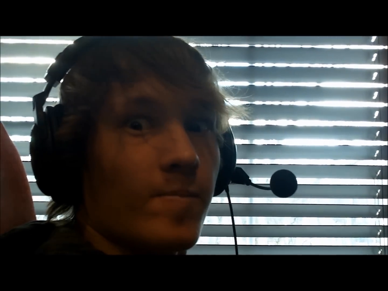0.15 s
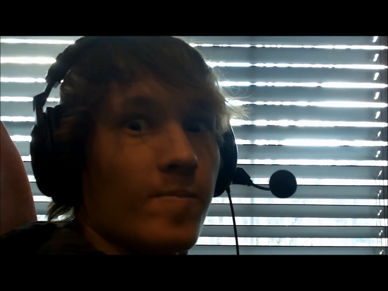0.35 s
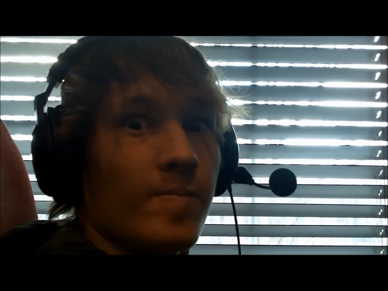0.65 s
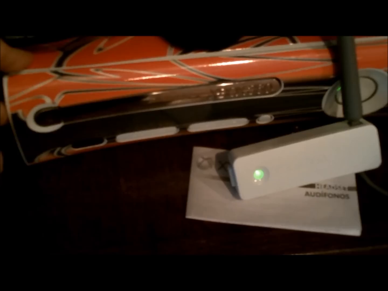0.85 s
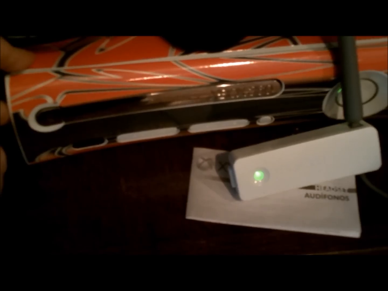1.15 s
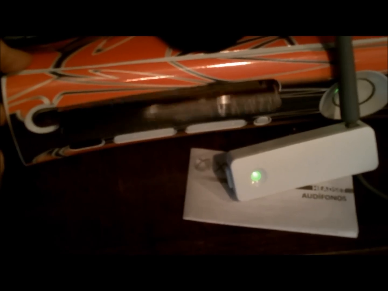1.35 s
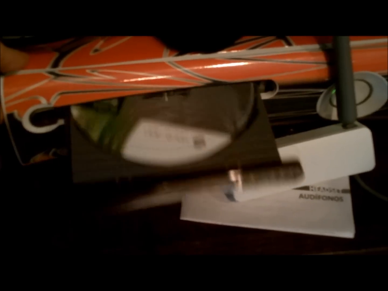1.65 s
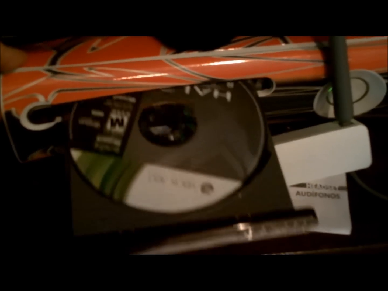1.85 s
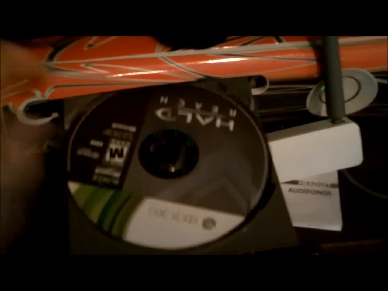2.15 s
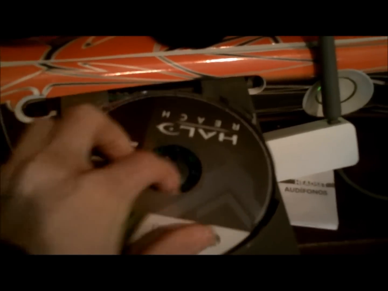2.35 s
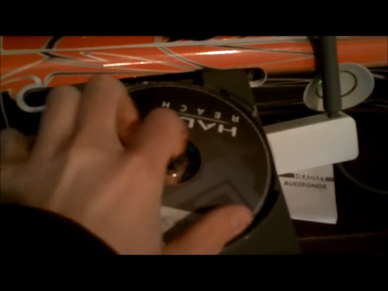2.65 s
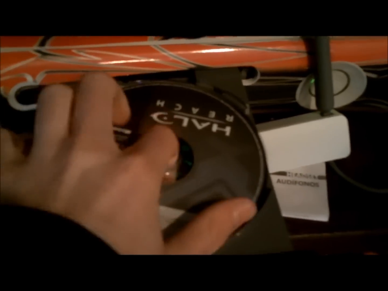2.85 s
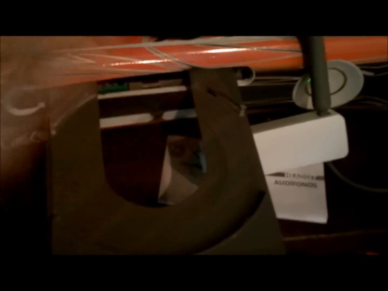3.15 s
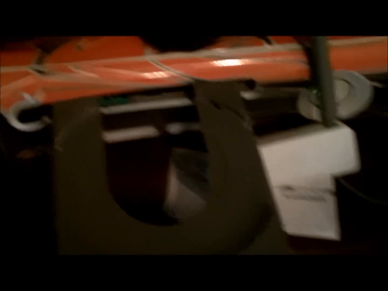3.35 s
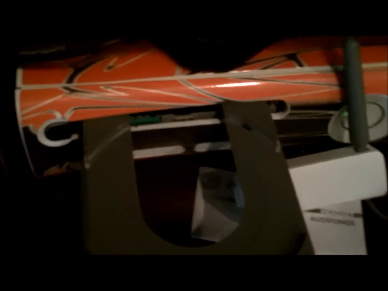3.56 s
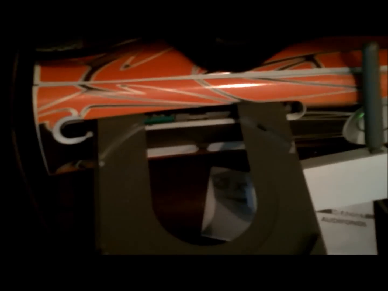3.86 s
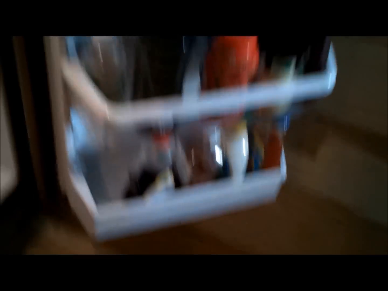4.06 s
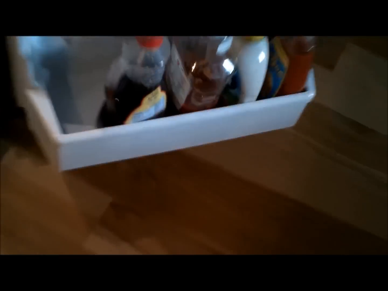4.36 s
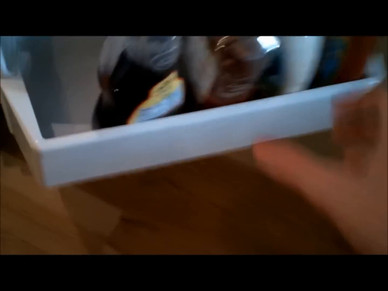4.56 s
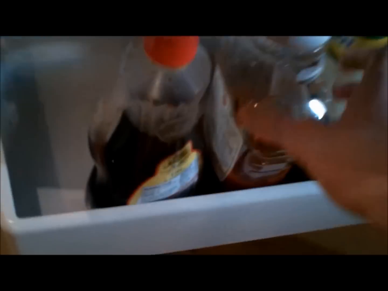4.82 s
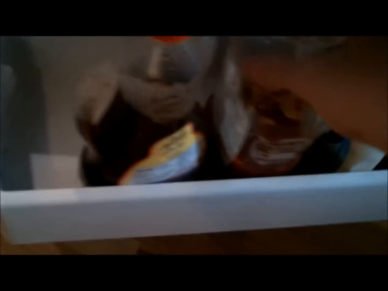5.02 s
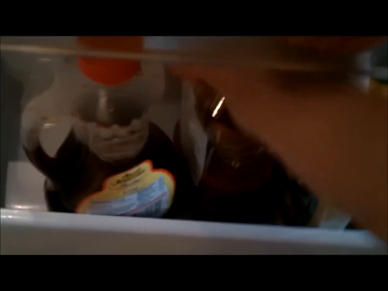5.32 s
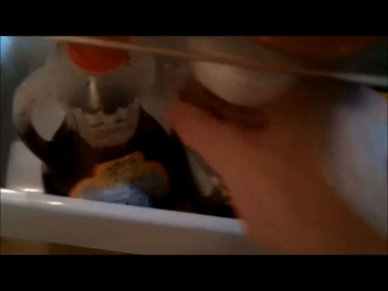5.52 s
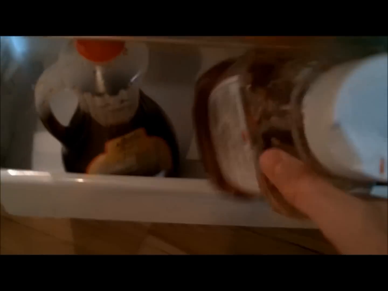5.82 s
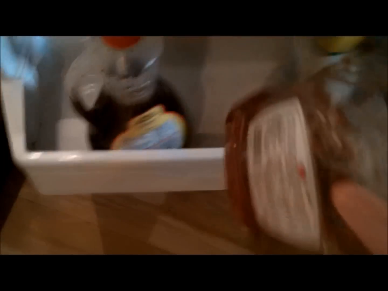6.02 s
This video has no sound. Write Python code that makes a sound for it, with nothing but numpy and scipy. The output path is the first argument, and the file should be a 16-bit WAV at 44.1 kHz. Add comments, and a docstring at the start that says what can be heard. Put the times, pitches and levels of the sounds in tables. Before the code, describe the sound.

Quiet room with a faint chair creak, then a humming console's plastic disc tray clatters out, then sleeves rustle and a fridge-shelf bottle knocks loudly.

```python
"""Three places in turn, each with its own noise-band air and wavering hum. First a quiet room: cloth rubs (clicks
through damped modes) and a chair joint creaks (slip-rate harmonics). From 0.946 s a console hums and whines; its
plastic disc tray slides out in knocks, pings and rubbing, then fingers lift the disc. From 4.075 s a kitchen:
sleeves rustle and a hand pulls a plastic bottle from a fridge door shelf, knocking rail and neighbours (modal
blows, hollow notes, snaps). A dull overall colour and a steady hiss lie over it all."""
import sys
import numpy as np
from scipy import signal
from scipy.fft import rfft, irfft, next_fast_len
from scipy.io import wavfile
from scipy.ndimage import uniform_filter1d

SR = 44100
rng = np.random.default_rng(int(sys.argv[2]) if len(sys.argv) > 2 else 0)


def to_wav(sig):
    """Store sig (one row per channel, or 1-D mono) as 16-bit WAV at the path in sys.argv[1].

    Samples outside -1..1 are clipped; the rate is SR.
    """
    pcm = np.clip(np.atleast_2d(sig), -1, 1) * 32767
    pcm = np.round(pcm).astype(np.int16)
    wavfile.write(sys.argv[1], SR, pcm.T)  # frames by channels


N = 272802

# All source levels are ahead of the overall colour.
# body modes of the disc tray: f/Hz, relative level/dB, t60/s
TRAY_MODES = [(83.4, 9, 0.083), (186, 8.5, 0.024), (313, -4, 0.014), (657, 0.5, 0.037), (992, -1.5, 0.025),
              (1329, 1, 0.15), (1500, 7, 0.027), (1820, 11, 0.004), (2216, 0, 0.0073), (2960, -4.5, 0.1),
              (3300, 3.5, 0.012), (3750, 9, 0.005), (4810, 3, 0.0031), (6800, -22, 0.036)]
# damped body modes of cloth: f/Hz, relative level/dB, t60/s
CLOTH_MODES = [(388, -11, 0.073), (697, 15, 0.014), (1060, 16.5, 0.0014), (2280, -19, 0.018),
               (3735, 8, 0.0046), (4950, 4, 0.049)]
SPOT_DB = 3  # rms shift of each mode with the spot struck


def gain_of(db):
    """dB to amplitude gain."""
    return 10 ** (np.asarray(db) / 20)


def evened(x):
    """Scales to rms 1."""
    return x / np.sqrt(np.mean(x ** 2) + 1e-20)


def smoothed_noise(count, width):
    """Slow random curve of rms 1: noise averaged twice over width samples."""
    once = uniform_filter1d(rng.standard_normal(count), width)
    return evened(uniform_filter1d(once, width))


def read(points, hz):
    """Reads a table on a log-frequency axis."""
    f, value = np.transpose(points)
    return np.interp(np.log(hz + 1), np.log(f + 1), value)


def add(mix, s, sound):
    """Mixes a sound in at second s."""
    part = mix[round(s * SR):][:len(sound)]
    part += sound[:len(part)]


def coloured(x, points):
    """Filters by a spectrum in dB."""
    size = next_fast_len(len(x) + 512)
    gain = gain_of(read(points, np.fft.rfftfreq(size, 1 / SR)))
    return irfft(rfft(x, size) * gain, size)[:len(x)]


def band(x, lo_hz, hi_hz):
    """Band-pass."""
    return signal.sosfilt(signal.butter(3, [lo_hz, hi_hz], "band", fs=SR, output="sos"), x)


def four_bands(x, low_hz):
    """Low, middle, upper and bright parts."""
    edges_hz = [low_hz, 900, 2400, 4200, 18000]
    return np.array([band(x, lo, hi) for lo, hi in zip(edges_hz, edges_hz[1:])])


def body(modes, direct_db, spot_db=0.):
    """Impulse response: the contact itself, then every mode dying away; the spot touched favours some modes."""
    t = np.arange(4096) / SR
    spot = spot_db * rng.standard_normal(len(modes))
    ring = np.zeros(len(t))
    for shift_db, (hz, db, t60) in zip(spot, modes):
        decay = gain_of(db + shift_db - 60 * t / t60)
        ring += decay * np.sin(2 * np.pi * hz * t) / np.sqrt(t60)
    ring = ring / np.linalg.norm(ring)
    ring[0] = gain_of(direct_db)
    return ring


def slips(count, spread_db, share):
    """Tiny stick-slip clicks of very uneven size, on a share of the samples."""
    sign, chance = rng.standard_normal(count), rng.random(count)
    size = np.minimum(rng.exponential(1, count), 4)
    return sign * (chance < share) * gain_of(spread_db * size)


def rub(rows, ring, low_db, upper_db, spread_db, share, flutter_db):
    """Slips under a moving surface ring the body; the pressure flutters."""
    upper_follows = 0.46  # dB in the upper band per dB of brightness
    s, *columns = np.transpose(rows)
    t = np.arange(s[0], s[-1], 1 / SR)
    level_db, bright_db = (np.interp(t, s, c) for c in columns)
    flutter = gain_of(flutter_db * smoothed_noise(len(t), 300))
    drive = slips(len(t), spread_db, share) * flutter
    rung = signal.oaconvolve(drive, ring)[:len(t)]
    low, mid, upper, high = (evened(b) for b in four_bands(rung, low_hz=236))
    upper = gain_of(upper_db + upper_follows * bright_db) * upper
    return s[0], gain_of(level_db) * (mid + gain_of(low_db) * low + upper + gain_of(bright_db) * high)


def background():
    """Room air, a wavering low hum with a noisy octave, and fan tones; levels step from place to place."""
    # places: start/s, air/dB, hum/dB, octave/dB, fan whine/dB, growth of hum and octave/(dB/s)
    places = [(0, -68.5, -65.5, -67.5, -81.5, -0.5), (0.946, -66, -55, -71.5, -69.5, 0),
              (4.075, -61, -64, -65.5, -100, 6)]
    # spectrum of the room air: f/Hz, relative density/dB
    air_spectrum = [(30, 21.5), (100, 12), (250, 10), (600, 4.5), (1300, -0.5), (2500, -0.5), (5000, -9.5),
                    (9000, -11)]
    # fan tones: f/Hz, relative level/dB
    fan_tones = [(1244, 0), (1120, -7), (1378, -10), (1500, -12), (1615, -13), (2775, -15), (3470, -13)]
    t = np.arange(N) / SR
    start, air_db, hum_db, octave_db, whine_db, growth_db = np.transpose(places)
    place = np.searchsorted(start, t, "right") - 1
    air = coloured(rng.standard_normal(N), air_spectrum)
    air = air / np.std(band(air, 500, 4000))
    waver, swell = (evened(band(rng.standard_normal(N), 10.0, 23.4)) for _ in range(2))
    hum_turns = np.cumsum(57 + 4.5 * waver) / SR
    hum = np.sqrt(2) * np.sin(2 * np.pi * hum_turns) * gain_of(2.2 * swell)
    octave = evened(band(rng.standard_normal(N), 89.3, 137.0))
    whine = np.zeros(N)
    for hz, db in fan_tones:
        drift = np.cumsum(rng.standard_normal(N)) * 0.015  # rad
        whine += gain_of(db) * np.sqrt(2) * np.sin(2 * np.pi * hz * t + drift)
    whine *= gain_of(1.6 * evened(band(rng.standard_normal(N), 12.0, 31)))
    levels = gain_of(np.array([air_db, hum_db, octave_db, whine_db]))[:, place]
    levels[1:3] *= gain_of(growth_db[place] * (t - start[place]))  # in the kitchen: nearing the fridge motor
    return (levels * [air, hum, octave, whine]).sum(0)


def cloth_shift():
    """A brief rub of cloth: dense slips through damped modes."""
    # t/s, pressure level/dB, brightness/dB
    pressure = [(.155, -83, -10), (.18, -66, -15), (.215, -67, -4), (.25, -78, -8)]
    ring = body(CLOTH_MODES, 6.9)
    return rub(pressure, ring, low_db=-22.0, upper_db=5.5, spread_db=4.5, share=1.0, flutter_db=3.0)


def creak():
    """Chair joint: quick, slightly uneven slips that hold their rate, then slow down and soften."""
    # t/s, slip rate/Hz, level/dB, number of the strongest partial
    joint = [(.333, 810, -80, 4), (.347, 812, -63, 4), (.36, 790, -74, 2.5), (.385, 770, -70, 2),
             (.41, 820, -67, 2.4), (.425, 740, -71, 1.4), (.46, 650, -73, 1), (.495, 570, -82, 1)]
    fall_db = 5  # per partial away from the strongest
    s, *columns = np.transpose(joint)
    t = np.arange(s[0], s[-1], 1 / SR)
    hz, level_db, top = (np.interp(t, s, c) for c in columns)
    jitter = .25 * uniform_filter1d(rng.standard_normal(len(t)), 200)
    turns = np.cumsum(hz * (1 + jitter)) / SR
    catch = evened(uniform_filter1d(rng.standard_normal(len(t)), 500))  # the joint catches unevenly
    level_db = level_db + 2.5 * catch
    sound = np.zeros(len(t))
    for k in range(1, 5):
        sound += gain_of(level_db - fall_db * abs(k - top)) * np.cos(2 * np.pi * k * turns)
    return s[0], sound


def room(x):
    """Sparse reflections of random sign, each band dying at its own speed."""
    # f/Hz, t60/s
    decay = [(250, 0.2), (700, 0.23), (1800, 0.056), (5000, 0.044)]
    taps = np.zeros(SR // 2)
    at = np.arange(150, len(taps) - 20, 20)
    taps[at + rng.integers(0, 20, len(at))] = rng.choice([-1., 1.], len(at))
    hz, t, z = signal.stft(taps, SR, nperseg=256)
    fade = gain_of(-60 * t / read(decay, hz)[:, None])
    tail = signal.istft(z * fade, SR, nperseg=256)[1]
    return signal.fftconvolve(x, tail / np.linalg.norm(tail))[:N]


def blow(row, ring, low_hz, usual_db, rise_share, first_db, upper_db):
    """One contact and its dying rattle through the body modes; long or gentle ones build slowly, hard ones crack."""
    sharper_when_hard = 0.09  # dB of first contact per dB of blow
    upper_follows = 0.32  # dB in the upper band per dB of brightness
    contact_hz = 10200  # soft plastic: each contact loses its edge above this
    s, peak_db, low_db, bright_db, t60 = row
    t = np.arange(SR // 8) / SR
    hard = gain_of(sharper_when_hard * (peak_db - usual_db))
    rise = 1 - np.exp(-t * hard / (rise_share * t60))
    drive = slips(len(t), 2.2, 0.16) * gain_of(-60 * t / t60) * rise
    drive[8] += gain_of(first_db) * hard
    drive = signal.lfilter(*signal.butter(1, contact_hz, fs=SR), drive)
    parts = four_bands(signal.oaconvolve(drive, ring), low_hz)
    power = uniform_filter1d(parts ** 2, 200, axis=1).max(1)
    shares_db = np.array([low_db, 0, upper_db + upper_follows * bright_db, bright_db])
    return s - .0005, gain_of(peak_db + shares_db) / np.sqrt(power) @ parts


def tray_knocks(mix):
    """The tray's plastic struck: contact and rattle through its modes, each blow on another spot."""
    # t/s, peak of the middle band/dB, weight of the lows/dB, brightness/dB, rattle t60/s
    hits = [(1.367, -49, -11, -16, 0.14), (1.412, -46.5, 0.5, -7, 0.17), (1.4255, -46.5, -21, -7, 0.13),
            (1.4376, -43.5, -2, -7.5, 0.092), (1.4694, -35.5, -16, -3.5, 0.12),
            (1.4999, -33.5, -3, -17, 0.034), (1.5050, -35, -4, 1, 0.14), (1.517, -37, -11, -2.5, 0.16),
            (1.555, -45.5, -7, -4, 0.077), (1.6097, -51.5, -14, -20, 0.15), (1.714, -58, -11, -13, 0.098),
            (1.7744, -53.5, -22, -6, 0.14), (1.793, -54.5, -6.5, -6, 0.074), (1.828, -59, -15, -25, 0.08),
            (1.877, -49.5, -26, -26, 0.041), (1.913, -53.5, -24, -21, 0.1), (1.934, -61, -2, -25, 0.24),
            (1.9798, -55, -2.5, -5, 0.18), (2.255, -61.5, 1, -3, 0.18), (2.2975, -58, -7, 3, 0.2),
            (2.3244, -59, -17, 7, 0.024), (2.4835, -57.5, -7, 0, 0.1), (2.5304, -56.5, -7, 3.5, 0.15),
            (2.5538, -52.5, -5.5, -16, 0.041), (2.576, -57.5, -16, -1, 0.047),
            (2.7638, -53.5, -3.5, 3.5, 0.096), (2.7888, -53, -14, -38, 0.096), (2.875, -59.5, 10, 8, 0.051),
            (2.884, -54, -10, 6, 0.095), (2.8907, -44.5, -5, 6, 0.052), (2.986, -56, -7, 6, 0.13),
            (3.0245, -59, -9, -38, 0.048), (3.041, -67.5, 14, -19, 0.041), (3.1052, -42.5, -19, 1.5, 0.093),
            (3.1168, -42, -3.5, 2.5, 0.083), (3.128, -47, -7, -7, 0.052), (3.143, -49.5, -15, 12, 0.069),
            (3.146, -41.5, -9, -17, 0.077), (3.168, -48, -1, -12, 0.22), (3.191, -36, -9, -1.5, 0.066),
            (3.202, -43.5, -10, -9, 0.048), (3.209, -48, -6, -6, 0.065), (3.63, -58.5, 2, 1.5, 0.11)]
    for row in hits:
        ring = body(TRAY_MODES, 3.2, SPOT_DB)
        add(mix, *blow(row, ring, low_hz=70, usual_db=-52.0, rise_share=0.035, first_db=1.0, upper_db=2.5))


def ringing_note(s, level_db, hz, t60):
    """One mode that swells for about a cycle, wanders a little and dies away."""
    wobble = 0.03  # rms share by which the note wanders
    t = np.arange(SR // 5) / SR
    wander = np.minimum(t / t60 * 10, 1) * smoothed_noise(len(t), 400)
    turns = np.cumsum(hz * (1 + wobble * wander)) / SR
    swell = 1 - np.exp(-t * hz / 0.24)
    return s, gain_of(level_db - 60 * t / t60) * swell * np.sin(2 * np.pi * turns)


def panel_pings(mix):
    """Tray knocks that set one panel ringing clearly, a single mode each."""
    # t/s, level before swell and decay/dB, f/Hz, t60/s
    pings = [(1.437, -34.5, 1430, .04), (1.4703, -27.5, 3790, 0.034), (1.504, -28, 2900, 0.037),
             (1.504, -33, 1550, 0.044), (1.511, -36, 870, .05), (1.515, -28, 3830, 0.057),
             (1.514, -41, 1390, .04), (1.519, -29, 3250, 0.035), (1.513, -50, 100, .12),
             (1.534, -38, 170, 0.11), (1.538, -37, 1450, 0.054), (1.61, -50, 1300, .07),
             (1.665, -49, 1255, 0.061), (1.775, -56, 1360, 0.063), (1.827, -54, 1250, 0.086),
             (1.878, -47, 1850, 0.054), (1.881, -55, 1340, .06), (1.906, -53, 2710, 0.065),
             (1.929, -52, 2832, .07), (1.981, -51, 1270, 0.14), (1.97, -49.5, 3600, .06),
             (1.668, -57, 2870, 0.07), (1.713, -53, 2850, .05), (2.315, -49.5, 3460, 0.044),
             (2.32, -46, 6650, 0.044), (2.485, -45, 2910, 0.04), (2.553, -44, 1000, 0.036),
             (2.892, -37.5, 3140, 0.036), (2.988, -53, 4930, .06), (3.026, -50, 1150, .07),
             (3.009, -52, 1400, .03), (3.106, -39, 1660, 0.033), (3.117, -36, 904, 0.027),
             (3.148, -34, 1390, .03), (3.191, -40, 732, 0.025), (3.1925, -31.5, 2110, 0.03),
             (3.193, -40, 1140, 0.045), (3.202, -48, 1330, 0.044)]
    for row in pings:
        add(mix, *ringing_note(*row))


def tick(s, peak_db, hz, cycles, edge_db):
    """A short swing with a sharp edge in its middle."""
    t = np.arange(-300, 300) / SR
    swing = np.exp(-(t * hz / cycles) ** 2) * np.cos(2 * np.pi * hz * t)
    edge = np.convolve(t == 0, [-.5, 1, -.5], "same")
    return s + t[0], gain_of(peak_db) * (swing + gain_of(edge_db) * edge)


def snaps_and_bumps(mix):
    """Short snaps and bumps with hardly any ring: Gaussian swings."""
    # t/s, swing peak/dB, f/Hz, width/cycles, edge relative to swing/dB
    snaps = [(1.508, -34, 132, 1, -60), (2.8925, -32, 4780, 6, -30), (3.1058, -41, 4900, 3.5, -20),
             (3.5525, -55, 5500, 1.1, 5), (3.8675, -27, 5700, 0.97, 13), (3.8687, -44, 3750, 1.4, -20),
             (5.70785, -3.6, 1800, 0.65, -10), (5.7855, -14, 330, 0.8, -40), (5.851, -22, 520, 1.2, -30)]
    for row in snaps:
        add(mix, *tick(*row))


def tray_slide():
    """The tray rides its rails: sparse slips through the rail modes."""
    # t/s, pressure level/dB, brightness/dB
    pressure = [(1.53, -62, -8), (1.6, -71, 14), (1.68, -62.5, 3.5), (1.8, -61.5, 4), (1.87, -58.5, 1),
                (1.93, -57, -0.5), (2.15, -73, 10.5)]
    # modes of the tray on its rails: f/Hz, relative level/dB, t60/s
    rail_modes = [(292, -2, .03), (640, -4, 0.036), (985, 3, 0.046), (1274, 2, 0.036), (1500, 2.5, 0.045),
                  (1830, 0, .04), (2280, -3.5, .03), (2850, -1.5, .025), (3540, 4.5, 0.0079),
                  (4760, -13, 0.0068)]
    ring = body(rail_modes, -4.5)
    return rub(pressure, ring, low_db=-10.5, upper_db=-0.5, spread_db=2.5, share=.2, flutter_db=2.0)


def fingers_on_disc():
    """Fingers rub on the disc: sparse slips through the tray modes."""
    # t/s, pressure level/dB, brightness/dB
    pressure = [(2.64, -71, 5), (2.69, -68, -7), (2.76, -60, 2), (2.83, -71, 3)]
    ring = body(TRAY_MODES, 2.6)
    return rub(pressure, ring, low_db=-1.0, upper_db=-4.0, spread_db=2.5, share=0.11, flutter_db=-3.0)


def bounced(x):
    """Adds one reflection whose delay wanders to and fro: a comb slides through the rustle."""
    # reflection off the door: t/s, delay/ms, share of the direct sound
    reflection = [(4.07, 1, 0.024), (4.4, 0.56, 0.1), (4.65, 0.47, 0.21), (5.0, 0.51, 0.043),
                  (5.3, 0.094, 0.026), (6.19, 0.43, 0.087)]
    s, ms, share = np.transpose(reflection)
    n = np.arange(N)
    delay = np.interp(n / SR, s, ms) * SR / 1000  # samples
    return x + np.interp(n / SR, s, share) * np.interp(n - delay, n, x)


def patchy(x, patchy_db):
    """Folds of cloth come and go: streaks of colour some hundred Hz wide that last a moment."""
    hz, t, z = signal.stft(x, nperseg=512, noverlap=384)
    patches = rng.standard_normal(z.shape)
    patches = evened(uniform_filter1d(uniform_filter1d(patches, 4, 0), 24, 1))
    return signal.istft(z * gain_of(patchy_db * patches), nperseg=512, noverlap=384)[1][:N]


def streaked(x):
    """Lifts a gliding band of the rustle for the length of each streak."""
    # start/s, end/s, from f/Hz, to f/Hz, width/Hz, gain of the added band/dB
    streaks = [(4.425, 4.594, 3900, 3650, 450, 1), (4.466, 4.553, 990, 1230, 150, 5.5),
               (4.562, 4.803, 1500, 1970, 200, 0.5), (4.62, 5.02, 1980, 2420, 350, -2),
               (4.7, 5.003, 3530, 3700, 250, -1), (5.362, 5.563, 2940, 3300, 404, -0.5)]
    out = x.copy()
    for start, end, from_hz, to_hz, width_hz, lift_db in streaks:
        part = x[round(start * SR):round(end * SR)]
        glide_hz = np.linspace(from_hz, to_hz, len(part))
        turn = np.exp(2j * np.pi * np.cumsum(glide_hz) / SR)
        r = np.exp(-np.pi * width_hz / SR)
        # shift the band to 0 Hz, low-pass, shift back
        narrow = 2 * (turn * signal.lfilter([(1 - r) ** 2], [1, -2 * r, r * r], part / turn)).real
        add(out, start, gain_of(lift_db) * np.sqrt(np.hanning(len(part))) * narrow)
    return out


def sleeve_rustle():
    """Sleeves rub: slips through cloth modes, then patches, gliding streaks and the door's reflection."""
    # t/s, pressure level/dB, brightness/dB
    pressure = [(4.075, -55, -1), (4.09, -51, -4.5), (4.24, -58, -5), (4.277, -50, -6), (4.447, -47, -5.5),
                (4.53, -40, -6.5), (4.6, -46.5, -4), (4.77, -54, 2), (4.815, -51.5, 0), (5.04, -61, 6.5),
                (5.12, -54, 1), (5.135, -48.5, 2.5), (5.193, -47.5, 7), (5.27, -51.5, 0),
                (5.355, -53.5, -1.5), (5.4, -44.5, 5.5), (5.5, -41.5, 0.5), (5.67, -54, 1),
                (5.95, -52.5, -0.5), (6.062, -46, 3.5), (6.186, -47, -4.5)]
    sleeves, ring = np.zeros(N), body(CLOTH_MODES, 6.9)
    add(sleeves, *rub(pressure, ring, low_db=-4.0, upper_db=2.0, spread_db=-0.5, share=0.46, flutter_db=0.53))
    return bounced(streaked(patchy(sleeves, patchy_db=1.3)))


def bottle_clinks(mix):
    """Bottles and jars knocked: each rings its own hollow note, wandering as the vessel rocks."""
    # t/s, level before swell and decay/dB, f/Hz, t60/s
    clinks = [(5.047, -37.5, 672, 0.097), (5.062, -52, 314, 0.28), (5.085, -45.5, 633, 0.3),
              (5.151, -40, 345, 0.063), (5.244, -40.5, 345, 0.057), (5.458, -36.5, 618, 0.1),
              (5.463, -44, 339, 0.17), (5.492, -43, 620, 0.12), (5.525, -38, 360, 0.1),
              (5.69, -26, 230, 0.097), (5.69, -27.5, 480, 0.06), (5.708, -20.5, 327, 0.1),
              (5.708, -24, 1716, 0.044), (5.7069, -16, 2910, 0.055), (5.708, -33.5, 111, 0.15),
              (5.708, -43, 940, 0.069), (5.708, -26, 645, 0.033), (5.722, -20, 442, 0.055),
              (5.731, -25, 934, 0.067), (5.729, -18.5, 1350, 0.07), (5.733, -27, 202, 0.046),
              (5.738, -22, 466, 0.051), (5.744, -28, 817, 0.049), (5.752, -22.5, 471.7, 0.15),
              (5.753, -27, 996, 0.054), (5.763, -20, 310, 0.074), (5.766, -19, 1500, .03),
              (5.776, -26, 470, 0.018), (5.768, -30, 4810, 0.069), (5.767, -23, 2610, 0.046),
              (5.774, -32, 880, 0.057), (5.775, -30, 152, 0.21), (5.795, -22, 320, 0.045),
              (5.838, -23, 375, .04), (5.848, -24.5, 180, 0.063), (5.847, -18, 492, 0.034),
              (5.862, -18, 368, 0.034), (5.87, -31, 490, 0.044), (5.89, -24, 506, 0.054),
              (5.887, -28, 182, 0.08), (5.895, -22, 328, 0.031), (5.904, -27, 460, 0.037),
              (5.914, -35.5, 240, 0.12), (5.949, -28.5, 337, 0.045), (5.98, -38, 3084, 0.066),
              (6.068, -40.5, 341, 0.14), (6.142, -41.5, 664, 0.39)]
    for row in clinks:
        add(mix, *ringing_note(*row))


def shelf_knocks(mix):
    """The bottle knocks the door shelf: contact and rattle through the shelf modes."""
    # t/s, peak of the middle band/dB, weight of the lows/dB, brightness/dB, rattle t60/s
    hits = [(5.0647, -45.5, -1, -6.5, 0.16), (5.154, -59, 8, -3, 0.048), (5.2439, -53, 5.5, 5, 0.048),
            (5.405, -53.5, 13, -5, 0.19), (5.475, -61, 5, -5, 0.092), (5.525, -61, 16, -7, 0.044),
            (5.688, -35.5, -4, -2, 0.062), (5.701, -30.5, 7.5, -2, 0.16), (5.7088, -21.5, -15, -9, 0.025),
            (5.7169, -22, -2, -9, 0.017), (5.7302, -21.5, -18, -10.5, 0.09),
            (5.7432, -25.5, -10, -19, 0.051), (5.758, -32, -14, -13, 0.072),
            (5.7681, -23.5, -2.5, -10, 0.087), (5.7769, -29.5, -16, -8.5, 0.041),
            (5.7957, -42, -11, -7, 0.26), (5.8234, -32, -3, -7.5, 0.14), (5.833, -35, -2, -14, 0.12),
            (5.8616, -38, -1, -32, 0.035), (5.888, -29, -2.5, -10.5, 0.04), (5.897, -57, 11, -22, 0.053),
            (5.921, -50, -4, -12, 0.075), (5.952, -43.5, -13, 0.5, 0.069), (5.9787, -64, -13, 0, 0.13),
            (6.067, -47.5, -12, 6, 0.19)]
    # f/Hz, relative level/dB, t60/s
    shelf_modes = [(172, -17, 0.036), (237, -2, 0.065), (345, 6.5, 0.16), (422, -17, 0.042),
                   (506, 10, 0.016), (670, 11, 0.01), (926, 8.5, 0.011), (1350, 7, 0.0055),
                   (1740, 2, 0.011), (2080, 2.5, 0.014), (2700, -10, 0.037), (3320, 11, 0.0021),
                   (3680, -2, 0.0068), (4930, -12, .012)]
    for row in hits:
        ring = body(shelf_modes, 0.9, SPOT_DB)
        add(mix, *blow(row, ring, low_hz=154, usual_db=-30.5, rise_share=0.021, first_db=-1.0, upper_db=0.25))


def scene():
    """Creak, blows and notes ring on in the room; rubbing and snaps are close and dry."""
    near = np.zeros(N)
    add(near, *creak())
    tray_knocks(near)
    panel_pings(near)
    bottle_clinks(near)
    shelf_knocks(near)
    mono = near + gain_of(-12.5) * room(near) + background() + sleeve_rustle()
    add(mono, *cloth_shift())
    snaps_and_bumps(mono)
    add(mono, *tray_slide())
    add(mono, *fingers_on_disc())
    return np.array([mono, mono])


def record(dry):
    """Dull colour, hiss with faint whistles and narrow dips; two channels, the left one sample late."""
    # overall colour, dull with a gap near 8 kHz and faint treble above: f/Hz, gain/dB
    overall_colour = [(60, -3.5), (3800, -3), (5000, -0.5), (6300, -8.5), (7300, -18.5), (7900, -36),
                      (8400, -29), (9600, -19.5), (12000, -21), (13500, -25.5), (15000, -27), (15500, -34)]
    # narrow dips in the sound: f/Hz, width/Hz, depth/dB
    narrow_dips = [(4210, 70, -11), (4200, 330, -9), (8800, 200, -16), (12600, 250, -14)]
    # hiss spectrum: f/Hz, relative density/dB
    hiss_spectrum = [(200, -12), (4000, -52), (7000, -14), (10000, -8.5), (13000, -5.5), (14900, -13),
                     (15300, -61)]
    # faint electronic whistles: f/Hz, level ahead of the dips/dB
    whistles = [(4735, -92), (6592, -102), (7101, -103)]
    hiss_db, edge_hz = -84, 15900  # hiss rms ahead of the dips; final low-pass
    t, hz = np.arange(N) / SR, np.fft.rfftfreq(N, 1 / SR)
    hiss = gain_of(hiss_db) * evened(coloured(rng.standard_normal(N), hiss_spectrum))
    hiss += sum(gain_of(db) * np.sqrt(2) * np.sin(2 * np.pi * f * t) for f, db in whistles)
    dips_db = sum(db / (1 + (2 * (hz - f) / width) ** 2) for f, width, db in narrow_dips)
    heard = irfft(rfft(coloured(dry[0], overall_colour) + hiss) * gain_of(dips_db), N)
    pair = np.array([np.roll(heard, 1), heard])
    low_pass = signal.firwin(511, edge_hz, window=("kaiser", 9), fs=SR)
    return signal.oaconvolve(pair, low_pass[None], "same")


dry = scene()
out = record(dry)
to_wav(out)
```